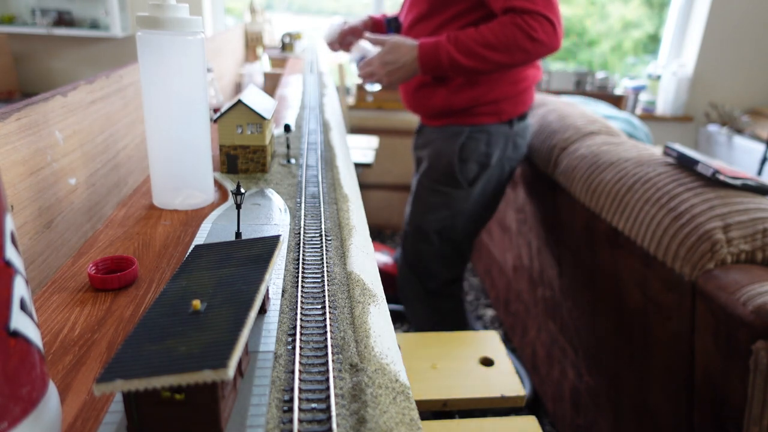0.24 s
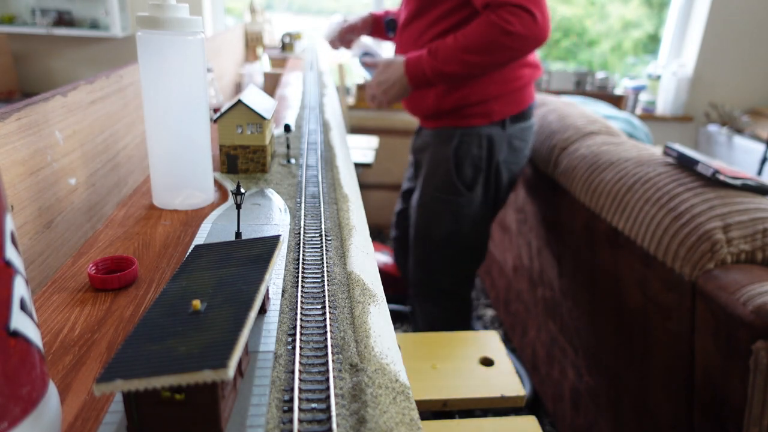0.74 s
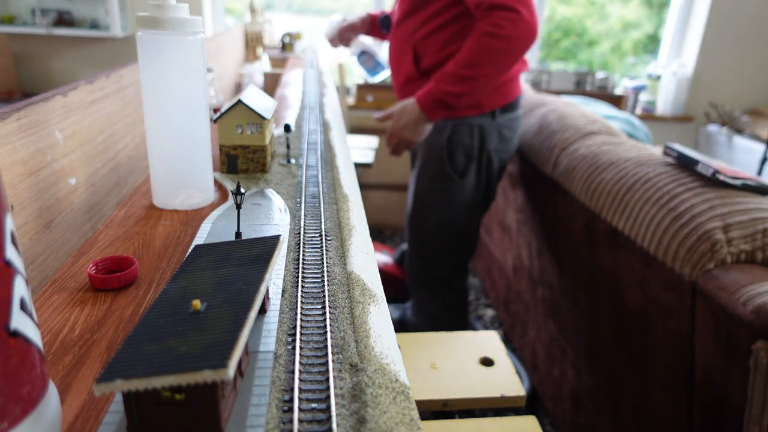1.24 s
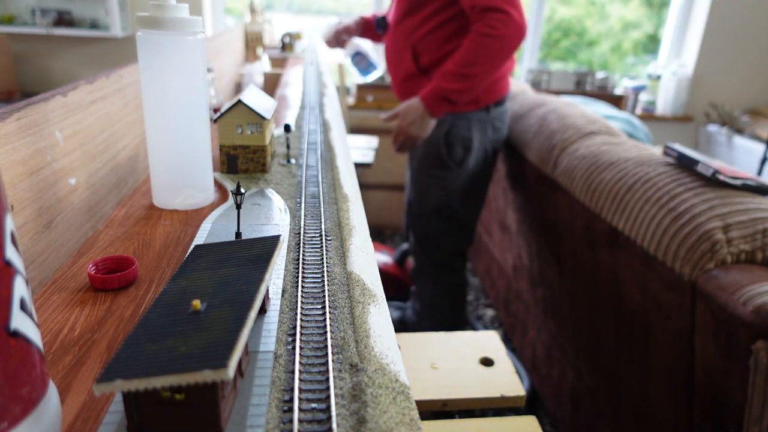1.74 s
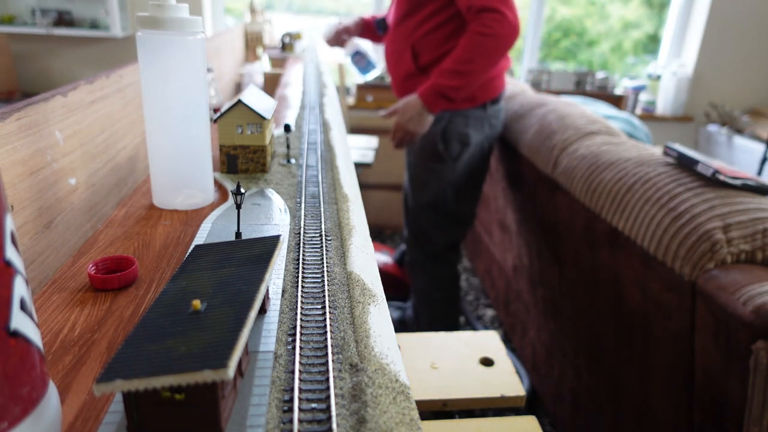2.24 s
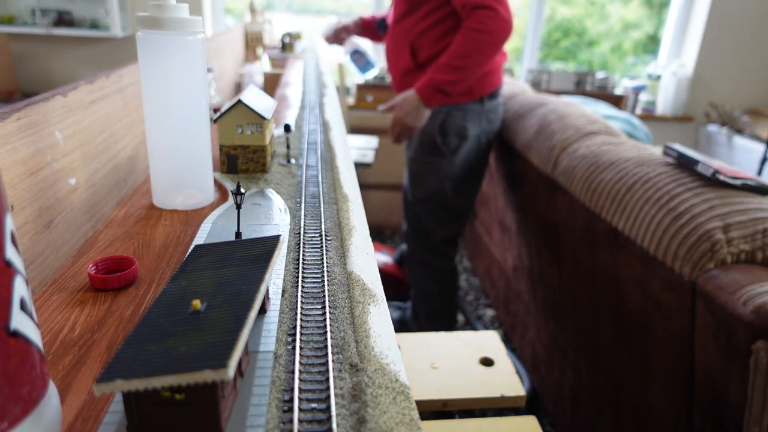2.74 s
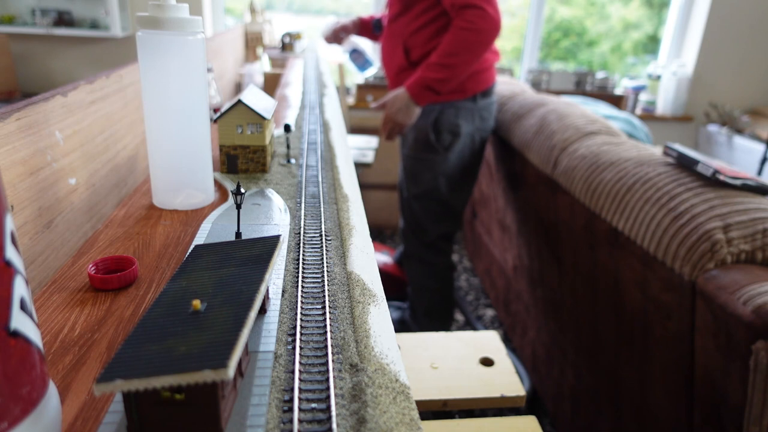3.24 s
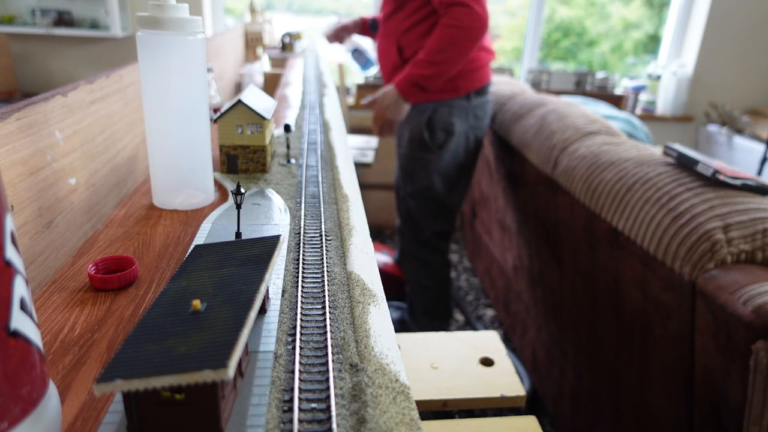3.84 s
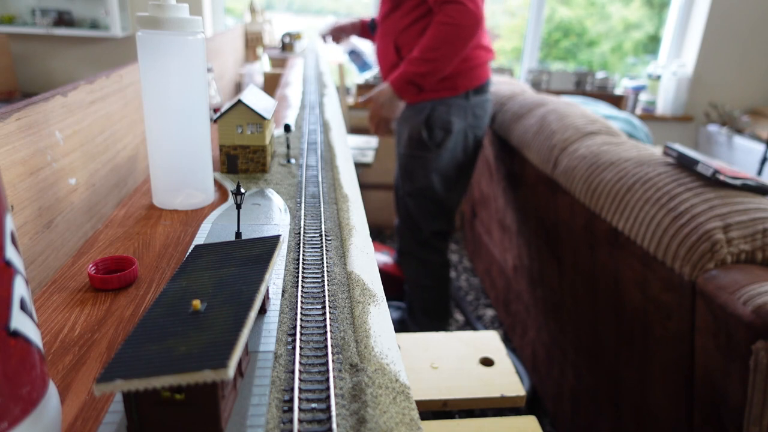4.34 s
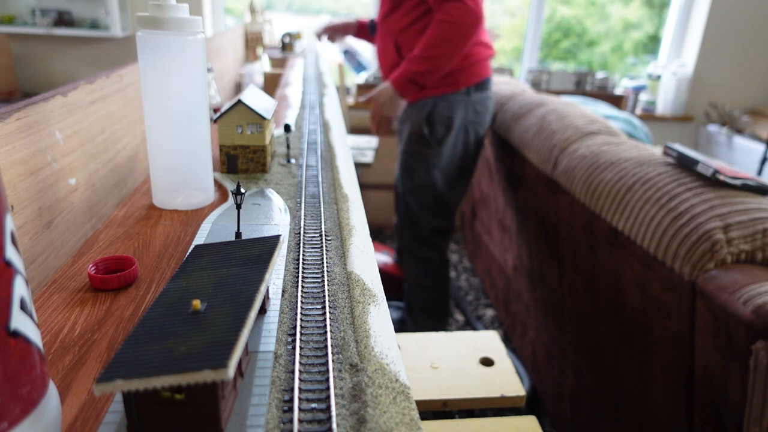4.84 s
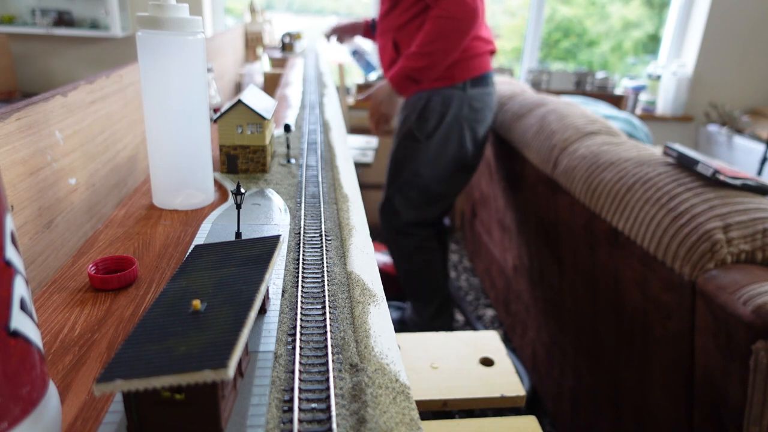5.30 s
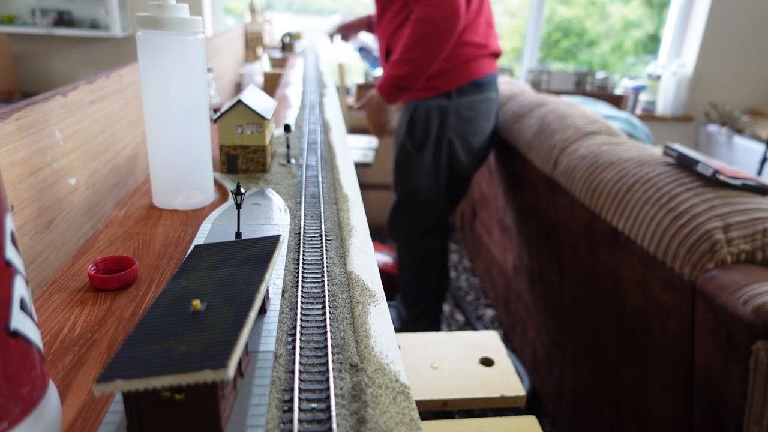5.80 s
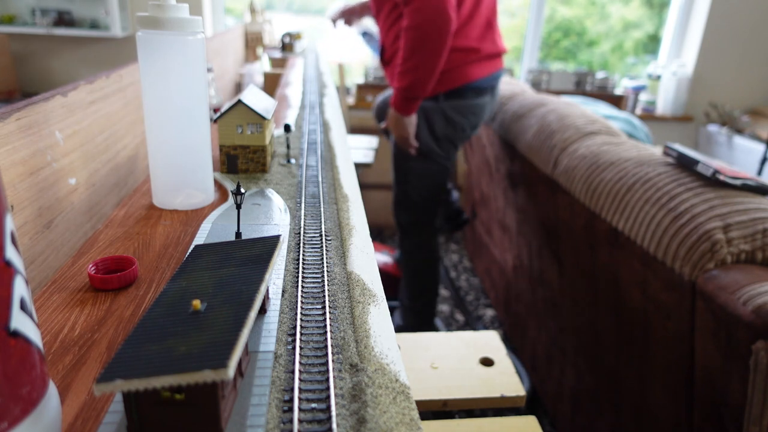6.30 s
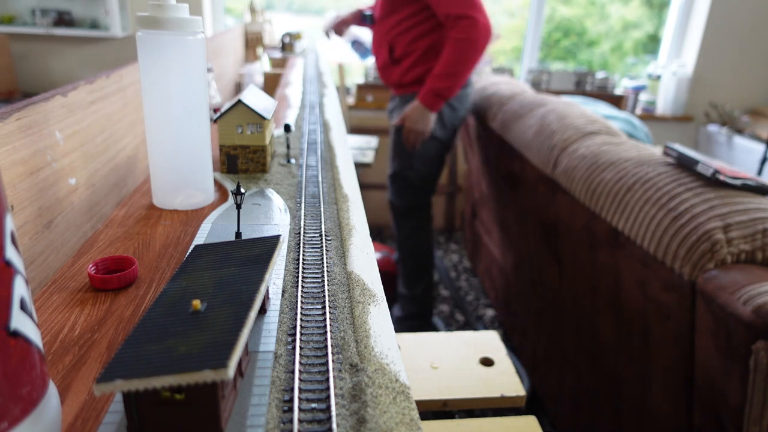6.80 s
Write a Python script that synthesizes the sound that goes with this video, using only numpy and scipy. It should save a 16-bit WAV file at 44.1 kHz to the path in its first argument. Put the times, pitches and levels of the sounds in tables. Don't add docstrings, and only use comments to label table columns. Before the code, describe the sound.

A trigger spray bottle is pumped rapidly, four crisp clicking squirts a second, in a furnished room; one wooden knock booms, then clothes rustle at the end.

```python
import sys
import numpy as np
from scipy import signal
from scipy.fft import rfft, irfft
from scipy.io import wavfile
from scipy.ndimage import uniform_filter1d

SR = 44100
rng = np.random.default_rng(int(sys.argv[2]) if len(sys.argv) > 2 else 0)


def store_wav(level_fs):
    pcm = np.round(np.clip(np.atleast_2d(level_fs), -1, 1) * 32767)
    wavfile.write(sys.argv[1], SR, pcm.T.astype(np.int16))


def undo_db(level):
    steps = np.asarray(level, float) / 20
    return 10 ** steps


N = 311346

# (time [s], gap to second coil [s], effort [dB], mist level [dB], mist length [factor])
STROKES = [(0.0327, 0.01, -4, -24, 1.1), (0.2691, 0.0099, 4, -24.5, 1.02),
           (0.5064, 0.0087, -1, -23.5, 1.074), (0.749, 0.0072, -18, -27.5, 1.03),
           (0.993, 0.01, 2, -25.5, 0.96), (1.2377, 0.0092, 0, -24.5, 1.12), (1.484, 0.011, 1, -25, 1.034),
           (1.7226, 0.011, -3, -24, 1.05), (1.9511, 0.01, -9, -25, 0.97), (2.173, 0.0091, 1, -23.5, 1.02),
           (2.4022, 0.0099, -9, -26.5, 1.02), (2.637, 0.011, -2, -26, 1.065),
           (2.8693, 0.011, -4, -25.5, 1.1), (3.126, 0.0098, -19, -26.5, 1.15),
           (3.3684, 0.01, -12, -28, 1.045), (3.5941, .0098, -2, -30.5, 1.11),
           (3.8434, 0.0093, 0, -28, 0.94), (4.0733, 0.01, -2, -27.5, 0.98), (4.3255, 0.012, -3, -31.5, 1.1),
           (4.5715, 0.0093, -11, -31, 1.1), (4.8218, 0.01, -7, -30.5, 1.04),
           (5.1936, 0.0081, -6, -33, 1.07), (5.4902, 0.01, -2, -29.5, 1.11)]
# (time [s], peak level [dB], loudest spring mode [Hz])
SLIPS = [(0.0327, -6, 6530), (0.0427, -4, 6770), (0.0508, -4, 6590), (0.0576, -9, 5550),
         (0.0617, -23, 7880), (0.2692, -5, 6720), (0.2752, -20, 6570), (0.2791, -4, 6520),
         (0.2848, -15, 6590), (0.294, -14, 5610), (0.5071, -6, 6560), (0.5166, -6, 6490),
         (0.5246, -10, 8140), (0.5314, -11, 6410), (0.5356, -19, 6490), (0.7493, -9, 6490),
         (0.7582, -6, 6660), (0.7653, -6, 6550), (0.7705, -11, 6640), (0.7786, -20, 6640),
         (0.9936, -5, 6610), (0.9995, -19, 6910), (1.0039, -5, 6520), (1.0095, -12, 6620),
         (1.0189, -15, 6590), (1.238, -6, 6650), (1.2488, -4, 6530), (1.2571, -6, 8100),
         (1.2635, -12, 6390), (1.2671, -20, 6500), (1.4844, -5, 6660), (1.4904, -18, 6700),
         (1.4947, -4, 6540), (1.5033, -6, 7230), (1.5105, -12, 5550), (1.7229, -9, 6530),
         (1.7323, -7, 6510), (1.7401, -7, 6680), (1.7459, -12, 6660), (1.7502, -21, 7390),
         (1.952, -6, 6660), (1.9575, -20, 6870), (1.9618, -6, 6620), (1.9698, -6, 6660),
         (1.9761, -13, 9330), (2.1728, -5, 6660), (2.1824, -4, 6650), (2.19, -11, 7330),
         (2.1965, -15, 6540), (2.2011, -19, 6450), (2.4028, -7, 6640), (2.4129, -4, 7400),
         (2.4211, -4, 6580), (2.4274, -11, 8250), (2.4318, -20, 6540), (2.6376, -6, 6630),
         (2.6478, -4, 6640), (2.6563, -9, 6580), (2.6626, -9, 8390), (2.6677, -19, 6980),
         (2.8698, -6, 6640), (2.8801, -4, 6610), (2.8885, -5, 7400), (2.895, -7, 8350),
              (2.8988, -20, 5500), (3.1261, -9, 6640), (3.1359, -6, 6740), (3.1435, -9, 6690),
              (3.1493, -13, 6830), (3.1573, -23, 6610), (3.3692, -8, 6650), (3.3791, -5, 6770),
              (3.387, -8, 6550), (3.393, -8, 6660), (3.3968, -22, 6520), (3.5946, -9, 6660),
              (3.6044, -6, 6740), (3.6124, -7, 6470), (3.6186, -11, 6560), (3.6239, -19, 6560),
              (3.8439, -10, 6610), (3.8488, -22, 6900), (3.8537, -8, 6540), (3.8618, -9, 6590),
              (3.868, -11, 9230), (4.0736, -7, 6680), (4.0836, -4, 7330), (4.0919, -9, 7270),
              (4.0986, -9, 9250), (4.1029, -21, 7610), (4.3259, -13, 8160), (4.3368, -10, 8230),
              (4.3455, -10, 8280), (4.3529, -9, 6540), (4.3566, -24, 6630), (4.5715, -8, 8200),
              (4.5815, -10, 8130), (4.5898, -5, 8240), (4.5961, -7, 7190), (4.6005, -24, 8370),
              (4.8231, -9, 7050), (4.8329, -8, 7040), (4.8409, -11, 10160), (4.8473, -12, 8180),
              (4.852, -24, 7640), (5.194, -16, 9400), (5.202, -13, 7960), (5.2087, -17, 6380),
              (5.2139, -14, 8100), (5.2238, -28, 7870), (5.491, -12, 6760), (5.4956, -18, 6150),
              (5.5009, -10, 6110), (5.5094, -6, 6870), (5.5162, -11, 6250)]
# (frequency [Hz], level [dB], t60 [s])
SPRING_MODES = [(4900, -8, .005), (7600, -3, .0048), (8600, -3, .0045), (9800, -5, .0045),
                (11200, -6, .004), (13800, -11, .004)]
# (place [coil gaps], faint scrape [dB], head ring [dB])
COILS = [(0, -9, 1.5), (0.548, -17, 2), (1, -19, 1.5), (1.302, -36, -8), (1.541, -22, 3), (1.818, -18, 1),
         (2.15, -32, -2), (2.46, -27, 2.5), (2.799, -35, -3), (3.103, -30, -5)]
# (main mode [Hz], main [dB], low modes [dB], high modes [dB])
HEAD_RINGS = [(1657, -16.5, -21.5, -21.5), (1700, -16, -20, -17), (1704, -17, -22, -22),
              (1660, -21.5, -24.5, -25.5), (1745, -16, -21, -21.5), (1711, -20, -24, -22.5),
              (1670, -16.5, -19.5, -20), (1670, -19.5, -20, -21), (1690, -18.5, -20.5, -20.5),
              (1772, -17.5, -19.5, -20), (1770, -15.5, -18, -21.5), (1815, -16.5, -19.5, -18),
              (1810, -18, -18, -18), (1740, -18.5, -22, -20.5), (1780, -16, -22.5, -20), (1710, -20, -22.5, -21),
              (1780, -18.5, -19.5, -19), (1740, -20, -21.5, -18), (1870, -24, -21, -24), (1598, -21, -19.5, -22),
              (1630, -21.5, -22, -24), (1537, -27.5, -26.5, -29), (1560, -22.5, -20.5, -21)]
# (frequency [Hz], level [dB], t60 [s])
HEAD_LOW = [(426, -4.5, 0.032), (853, -3, 0.034), (1280, -0.5, 0.023)]
HEAD_HIGH = [(2310, -7, 0.014), (2774, 11, 0.0042), (3500, 1.5, 0.0089)]
# (time [s], turn [0-1])
TURN = [
    (0, 0.2),
    (1.5, 0.21),
    (3, 0.33),
    (3.7, 0.75),
    (4.3, 0.56),
    (5.2, 1),
    (5.45, 0.9),
]
# (time after squeeze [s], level [dB])
MIST_SHAPE = [(0, -6.5), (.012, 3), (.022, 2.5), (.04, 3), (.065, 4.5), (.09, 1), (.115, -6.5), (.14, -17),
              (.17, -22.5), (.2, -24)]
# (frequency [Hz], density [dB per Hz])
MIST_SPECTRUM = [(180, -8), (300, -8.5), (500, -5.5), (780, -2.5), (1380, -0.5), (1700, 1.5), (4240, -1),
                 (6500, -1.5), (8500, -6), (12400, -17.5), (15600, -24), (16000, -60)]
# (time [s], level [dB])
THUMPS = [(0.062, -25.5), (0.3, -24.5), (0.539, -24), (0.783, -26), (1.034, -21.5), (1.285, -46),
          (1.511, -25), (1.753, -25), (1.998, -25), (2.203, -24.5), (2.436, -24.5), (2.675, -27),
          (2.902, -27), (3.158, -23), (3.404, -26), (3.624, -26.5), (3.876, -24), (4.106, -23),
          (4.366, -23.5), (4.604, -23), (4.855, -23.5), (5.219, -27), (5.527, -26)]
# (frequency [Hz], level [dB], t60 [s])
WALL_MODES = [(155, -2, .1), (185, 0, .07), (200, -11, .2), (250, -11, .16), (404, -10, .1)]
# (time [s], peak level [dB], relative head ring [dB], head mode [Hz])
RELEASES = [(0.212, -13, -8, 1700), (0.4355, -14, -9, 1700), (0.6831, -12.5, -14, 1220),
            (0.9192, -13, -13, 1720), (1.169, -16, 1, 1210), (1.429, -12, -11.5, 1280),
            (1.6535, -14, -6.5, 1700), (1.8994, -13.5, -12, 1680), (2.1142, -12.5, -6.5, 1570),
            (2.3451, -12.5, -13, 1700), (2.5712, -13, -7, 1240), (2.8119, -15, -6, 1330),
            (3.0544, -14, -14, 1340), (3.3141, -15.5, -7, 1390), (3.5486, -18, -7.5, 1840),
            (3.7814, -16, -4, 1190), (4.012, -18, -5, 1400), (4.2534, -16.5, -10, 1170),
            (4.5185, -16, -4.5, 1540), (4.7619, -18, -4.5, 1560), (5.0133, -18, -3, 1630),
            (5.385, -15.5, -3, 1190), (5.685, -16, -8, 1400)]
# (lever [Hz], stop [Hz], spring [Hz])
SLAP_MODES = [(2710, 6000, 6720), (2720, 4970, 6500), (2300, 5560, 6400), (2980, 4960, 6430),
              (2900, 5050, 7430), (2250, 5750, 6270), (2270, 5010, 6470), (2450, 4810, 6670),
              (2620, 4780, 6600), (2200, 5280, 6650), (2400, 5740, 6590), (2330, 5030, 7020),
              (2350, 4800, 6720), (2840, 5500, 6480), (3400, 4980, 6310), (2870, 5090, 7410),
              (2410, 5400, 9280), (2240, 5160, 6710), (2290, 4780, 7400), (2400, 5330, 8970),
              (2920, 5670, 6990), (3320, 5110, 7350), (3170, 4850, 7620)]
# (frequency [Hz], level [dB], t60 [s])
STOP_MODES = [(5200, -3.5, 0.005), (6630, -4.5, 0.0053), (7440, -2, 0.0027), (8940, 0.5, 0.0021),
              (11470, -9.5, 0.0021), (13900, -22, .003)]
# (time [share of chatter], level [dB])
BOUNCES = [
    (0, -5),
    (.19, 2),
    (.36, -2),
    (.6, -8),
    (.84, -7),
    (1.2, -15),
]
# (time [s], peak level [dB], frequency [Hz])
POPS = [(0.379, -25, 1050), (0.935, -25, 1100), (1.837, -28, 926), (2.074, -31, 1390), (2.274, -32, 1670),
        (2.529, -33, 2830), (2.573, -17, 1170), (2.581, -35, 1250), (2.815, -25, 1280), (3.007, -24, 1280),
        (3.049, -24.5, 1180), (3.321, -24, 1160), (3.501, -30, 1180), (3.566, -30, 1700), (3.79, -24, 2870),
        (4.2665, -22.5, 1230), (4.962, -36, 1650), (5.4863, -30, 1180), (5.669, -20.5, 1200),
        (5.678, -22, 1280), (5.723, -32, 1010), (5.754, -31, 1520), (5.779, -29, 1070),
        (6.664, -27.5, 1180), (6.684, -34, 1000), (6.709, -29, 900), (6.717, -31, 3860), (6.94, -22, 1630),
        (6.951, -21, 1630), (7, -20, 1170), (7.043, -17, 1660), (6.953, -27.5, 380), (7, -29, 3500),
        (7.018, -31, 3450), (7.042, -20, 3400), (7.046, -22, 1290), (5.906, -34, 2300), (6.099, -28, 900)]
# (frequency [Hz], density [dB per Hz])
BOOM_SPECTRUM = [(35, -59), (60, -32), (335, -12), (590, -17.5), (712, -21.5), (808, -24), (1360, -20.5),
                 (1990, -26.5), (2210, -24.5), (3030, -31.5), (9000, -44.5), (11700, -60), (19800, -120)]
# (frequency [Hz], level [dB], t60 [s])
WOOD_MODES = [(225.5, -14, 0.63), (310.5, -2.5, 0.19), (334.7, 3, 0.15), (406, -4.5, 0.24), (436, -9, .2),
              (494, -9, 0.41), (511, -5, 0.32), (585.4, -7, 0.34), (620, -11, 0.22), (160.5, -16.5, 0.39),
              (830, -7, 0.1), (1410, -8, 0.14), (1700, -5, 0.083), (2180, -7, 0.14)]
# (time [s], rubbing level [dB], relative silkiness [dB])
RUSTLE = [(5.7, -43, -8), (6.07, -36, -5.5), (6.298, -41.5, -4.5), (6.64, -41, -8), (6.775, -40, -7.5),
          (6.81, -46, -6), (6.87, -40.5, -10), (6.89, -33, -8), (7.06, -28.5, -0.5)]
# (frequency [Hz], density [dB per Hz])
CLOTH_SPECTRA = [
    [(60, -20), (150, -6), (300, -3.5), (700, -8), (900, -52)],
    [(500, -2), (800, 2), (2000, 0.5), (4000, 0), (5000, -1.5), (6000, -41)],
    [(4000, -44), (5200, 4), (10500, -5), (15600, -15.5), (16000, -60)],
]
# (time [s], level [dB])
SHIFTS = [(5.72, -40), (5.921, -35), (6.085, -46), (6.68, -36.5), (6.9, -46), (6.96, -43)]
# (time [s], level [dB], length [s], centre [Hz], width [Hz])
SCRAPES = [(6.053, -35.5, 0.068, 2510, 1400), (6.07, -34.5, 0.053, 970, 450), (6.642, -43, 0.15, 3860, 900),
           (6.077, -31, .024, 2840, 800), (6.946, -30, 0.017, 1700, 300), (6.976, -40, 0.08, 3500, 463)]
# (time [s], level [dB], frequency [Hz], t60 [s])
BOARDS = [(1.036, -22.5, 540, 0.022), (5.681, -32.5, 228, .03), (5.704, -36, 201, 0.048),
          (5.905, -28, 302, 0.3), (5.904, -31, 790, 0.065), (5.936, -34, 306, 0.1),
          (5.985, -35.5, 296, 0.52), (6.666, -42, 312, 0.044), (6.724, -38, 330, 0.039),
          (6.886, -35, 58, 0.1), (6.883, -43, 236, 0.065)]
# (frequency [Hz], t60 [s])
ROOM_T60 = [(100, 0.45), (500, 0.6), (2000, 0.41), (6000, 0.28), (14000, 0.41)]
# (frequency [Hz], density [dB per Hz])
AIR_SPECTRUM = [(18, -8), (40, 2), (70, -10), (120, -3.5), (300, 3), (560, -1), (900, -1.5), (1400, -2.5),
                (3900, -9), (6000, -14.5), (12000, -24.5), (15600, -26), (16000, -65)]
# (time [s], level [dB])
AIR_LEVEL = [(0, -39), (1, -42), (2.5, -42), (4, -42), (4.9, -43.5), (5.1, -40), (5.5, -44), (7.06, -59)]
# (frequency [Hz], level [dB rms])
WHINE = [(8000, -73), (9001, -73), (11999, -74), (13555, -79), (14998, -77)]


def evened(x):
    return x / np.sqrt(np.mean(x ** 2) + 1e-20)


def read(points, hz):
    f, value = np.transpose(points)
    return np.interp(np.log(hz + 1), np.log(f + 1), value)


def add(mix, s, sound):
    part = mix[round(s * SR):][:len(sound)]
    part += sound[:len(part)]


def highpass(x, order, hz):
    return signal.sosfilt(signal.butter(order, hz, "high", fs=SR, output="sos"), x)


def turned(t, facing_db, away_db):
    return facing_db + (away_db - facing_db) * np.interp(t, *np.transpose(TURN))


def ring(modes, seconds, rise_s, detune):
    t = np.arange(round(seconds * SR)) / SR
    hz, db, t60 = np.transpose(modes)[:, :, None]
    pitch_luck, phase_luck = rng.standard_normal((2, len(hz), 1))
    sines = np.sin(2 * np.pi * hz * (1 + detune * pitch_luck) * t + 2 * phase_luck)
    tone = (undo_db(db - 60 * t / t60) * sines).sum(0) * (1 - np.exp(-t / rise_s)) ** 2
    return tone / abs(tone).max()


def hiss(spectrum, patchy_db, flicker_db):
    frames = N // 64 + 5
    patches = uniform_filter1d(rng.standard_normal((frames, 129)), size=12, axis=0)
    patches = evened(uniform_filter1d(patches, size=4, axis=1)).T
    flicker = evened(uniform_filter1d(rng.standard_normal(frames), size=3))
    z = signal.stft(rng.standard_normal(frames * 64 - 64), nperseg=256, noverlap=192)[2]
    z = z * undo_db(patchy_db * patches + flicker_db * flicker)
    x = signal.istft(z, nperseg=256, noverlap=192)[1][:N]
    gain = undo_db(read(spectrum, np.fft.rfftfreq(N, 1 / SR)))
    return evened(irfft(rfft(x) * gain, N))


def spring():
    out = np.zeros(N)
    coil_hz, snap_t60_s, snap_lead_s = 6700, .0036, .00032
    head_main_db, head_low_db, head_high_db = 2.5, 1, 3
    for s, db, hz in SLIPS:
        coil_db = turned(s, 5, -9.5)
        after_ring = (coil_hz, coil_db - 15, .014)
        coil = [(hz, 4, snap_t60_s), (coil_hz, coil_db + 6, snap_t60_s), after_ring, *SPRING_MODES]
        add(out, s - snap_lead_s, undo_db(db + 3.5) * ring(coil, .025, .00012, .017))
    for (start, gap_s, effort_db, *_), (hz, main_db, low_db, high_db) in zip(STROKES, HEAD_RINGS):
        add(out, start + .00066, undo_db(main_db + head_main_db) * head_hum(hz, gap_s))
        parts = [(HEAD_LOW, low_db + head_low_db), (HEAD_HIGH, high_db + head_high_db)]
        for place, scrape_db, jolt_db in COILS:
            s = start + place * gap_s
            slip_db = effort_db + scrape_db + 1.5 * rng.standard_normal()
            add(out, s, undo_db(slip_db) * ring(SPRING_MODES, .025, .00021, .045))
            for modes, part_db in parts:
                head_db = part_db + jolt_db + 1.5 * rng.standard_normal()
                add(out, s + .00044, undo_db(head_db) * ring(modes, .05, .00016, .01))
    return out


def head_hum(hz, gap_s):
    head_t60_s, wander_hz, second_hz = .026, 60, 1710
    t = np.arange(SR // 12) / SR
    place, _, jolt_db = np.transpose(COILS)[:, :, None]
    since_s = t - gap_s * place
    jolt_db = jolt_db + 1.5 * rng.standard_normal((len(COILS), 1))
    power = (undo_db(2 * (jolt_db - 60 * abs(since_s) / head_t60_s)) * (since_s > 0)).sum(0)
    wander = wander_hz * evened(uniform_filter1d(rng.standard_normal((2, len(t))), size=130))
    main, second = np.sin(2 * np.pi * np.cumsum([[hz], [second_hz]] + wander, axis=1) / SR)
    return uniform_filter1d(np.sqrt(power), size=20) * (main + .5 * second) / 1.2


def mist():
    level, thumps = np.zeros(N), np.zeros(N)
    t = np.arange(SR // 4) / SR
    for s, _, _, mist_db, length in STROKES:
        shape_db = np.interp(t / length, *np.transpose(MIST_SHAPE), right=-90)
        add(level, s, undo_db(mist_db + 2 + shape_db))
    for s, thump_db in THUMPS:
        add(thumps, s - .014, undo_db(thump_db + 3.5) * ring(WALL_MODES, .3, .005, .03))
    droplets = undo_db(3.5 * uniform_filter1d(rng.exponential(1, N), size=12))
    jet = evened(hiss(MIST_SPECTRUM, patchy_db=1.5, flicker_db=1.7) * droplets)
    low = signal.lfilter(*signal.butter(2, 2000, fs=SR), jet)
    high = signal.lfilter(*signal.butter(2, 7000, "high", fs=SR), jet)
    time = np.arange(N) / SR
    low_gain = undo_db(turned(time, -2.5, 3)) - 1
    high_gain = undo_db(turned(time, 5, 6)) - 1
    return level * (jet + low_gain * low + high_gain * high) + thumps


def trigger():
    out = np.zeros(N)
    chatter_s = .0046
    for (s, db, head_db, head_hz), (lever_hz, stop_hz, spring_hz) in zip(RELEASES, SLAP_MODES):
        stop = [*STOP_MODES, (stop_hz, -4, .0045), (spring_hz, 0, .005)]
        lever = [(1250, -4, .006), (1900, -4, .005), (lever_hz, 0, .006), (3400, -3, .005), (4200, -5, .004)]
        head = [(head_hz, 0, .024), (1700, -5, .02)]
        add(out, s, undo_db(db + head_db - 3) * ring(head, .04, .0008, .005))
        for share, bounce_db in BOUNCES:
            hit_s = s + share * chatter_s * rng.uniform(.85, 1.15)
            lever_db = db + head_db / 2 + bounce_db / 2 - 6.5
            add(out, hit_s, undo_db(db + bounce_db) * ring(stop, .015, .000096, .02))
            add(out, hit_s, undo_db(lever_db) * ring(lever, .03, .00019, .051))
    for s, db, hz in POPS:
        pop = [(hz, 0, .0075), (hz * .8, -7, .005), (hz * 2.2, -12, .004)]
        add(out, s, undo_db(db + 5) * ring(pop, .03, .0003, .01))
        add(out, s, undo_db(db - 9) * ring(SPRING_MODES, .01, .0001, .08))
    return out


def knock():
    knock_s, knock_db = 1.0795, -11.5
    out, t = np.zeros(N), np.arange(SR) / SR
    hz, frame_s, z = signal.stft(rng.standard_normal(SR), SR, nperseg=1024)
    t60_s = 1.62 * read(ROOM_T60, hz)[:, None]
    boom_db = read(BOOM_SPECTRUM, hz)[:, None] - 60 * frame_s / t60_s
    boom = signal.istft(z * undo_db(boom_db), SR, nperseg=1024)[1][:SR]
    boom *= (1 - np.exp(-t / .0022)) / np.std(boom[:SR // 20])
    wood = ring([(f, db, min(t60, .6)) for f, db, t60 in WOOD_MODES], 1, .016, 0)
    blow_modes = [(350, 6.5, .015), (1460, -4, .046), (2450, 0, .02), (5000, -5, .013)]
    blow = ring(blow_modes, 1, .00024, 0)
    add(out, knock_s, undo_db(knock_db) * (undo_db(-1.5) * boom + undo_db(11) * wood + undo_db(11) * blow))
    return highpass(out, 4, 75)


def mover():
    t, out = np.arange(N) / SR, np.zeros(N)
    rise_db_per_s, fall_db_per_s = 300, 68
    weight = np.zeros(N)
    for s, db in SHIFTS:
        weight += undo_db(db - np.maximum(rise_db_per_s * (s - t), fall_db_per_s * (t - s)))
    times, rub_db, silk_db = np.transpose(RUSTLE)
    rub = undo_db(np.interp(t, times, rub_db, left=-99))
    silk = undo_db(np.interp(t, times, rub_db + silk_db, left=-99))
    for level, spectrum in zip((weight, rub, silk), CLOTH_SPECTRA):
        out += level * hiss(spectrum, patchy_db=1.5, flicker_db=.5)
    for s, db, length_s, hz, width_hz in SCRAPES:
        n = round(length_s * SR)
        grains = rng.standard_normal(n) * undo_db(4.2 * rng.exponential(1, n))
        band = signal.butter(2, [hz - width_hz / 2, hz + width_hz / 2], "band", fs=SR)
        add(out, s, undo_db(db) * evened(signal.lfilter(*band, grains)) * signal.windows.tukey(n, .45))
    for s, db, hz, t60 in BOARDS:
        board = [(hz, 0, t60), (hz * .84, -7, t60), (hz * 1.15, -9, t60)]
        add(out, s, undo_db(db + 6) * ring(board, .4, .002, 0))
    return out


def room(x):
    taps = np.zeros(SR // 2)
    at = np.arange(200, SR // 2 - 20, 20)
    taps[at + rng.integers(0, 20, len(at))] = rng.choice([-1., 1.], len(at))
    hz, t, z = signal.stft(taps, SR, nperseg=256)
    decay = undo_db(-60 * t / read(ROOM_T60, hz)[:, None])
    tail = signal.istft(z * decay, SR, nperseg=256)[1]
    return signal.fftconvolve(x, tail / np.linalg.norm(tail))[:N]


def air():
    level_db = np.interp(np.arange(N) / SR, *np.transpose(AIR_LEVEL))
    return undo_db(level_db) * hiss(AIR_SPECTRUM, patchy_db=.9, flicker_db=.4)


def whine():
    t = np.arange(N) / SR
    return sum(undo_db(db + 3) * np.sin(2 * np.pi * hz * t) for hz, db in WHINE)


def scene():
    bottle = highpass(spring() + mist() + trigger(), 4, 125)
    echo = undo_db(-16.5) * room(bottle)
    return (bottle + echo + knock() + mover() + air() + whine())[None]


def low_pass(x):
    return signal.sosfilt(signal.butter(12, 15800, fs=SR, output="sos"), x)


def record(dry):
    cut = highpass(dry, 2, 90) / 1.182
    finished = cut / (1 + cut ** 6) ** (1 / 6)
    return low_pass(finished)


dry = scene()
out = record(dry)
store_wav(out)
```